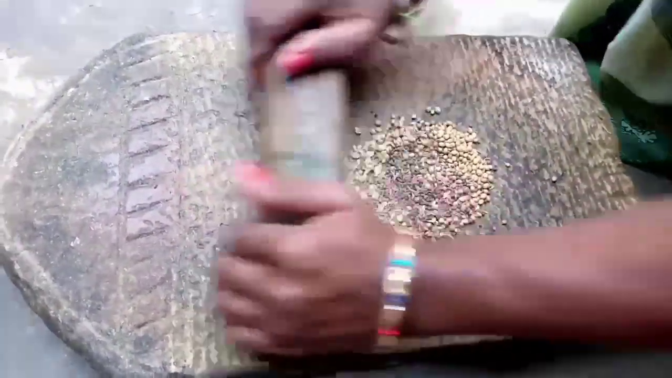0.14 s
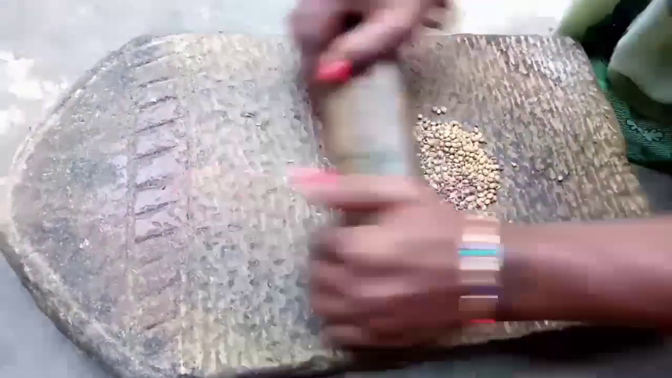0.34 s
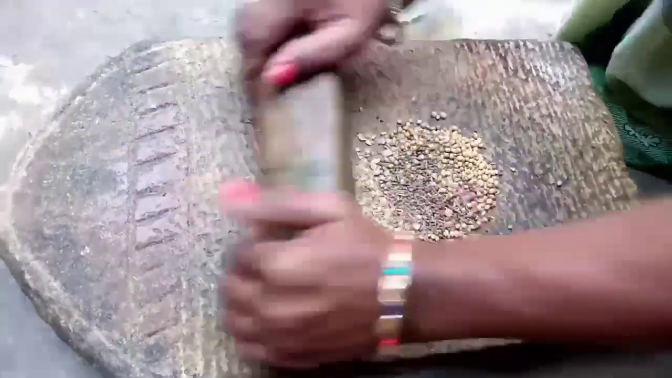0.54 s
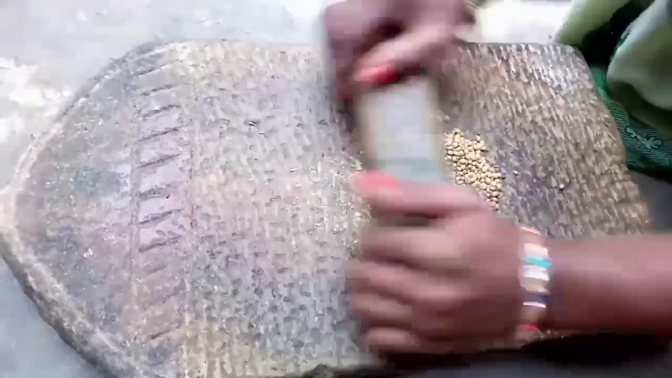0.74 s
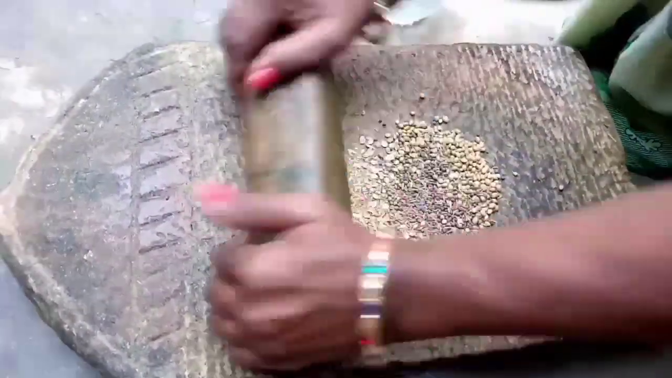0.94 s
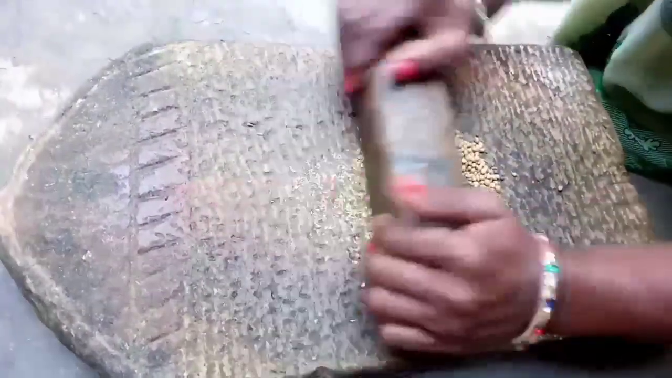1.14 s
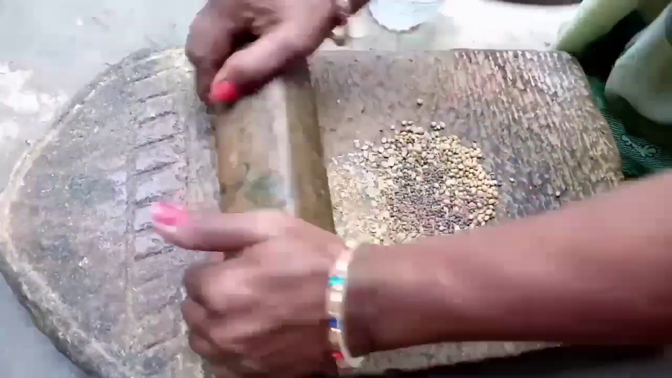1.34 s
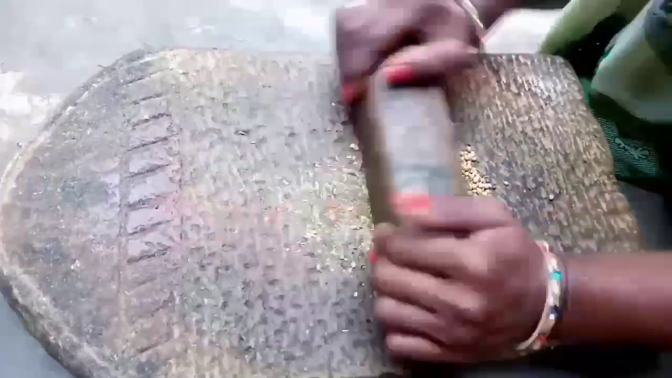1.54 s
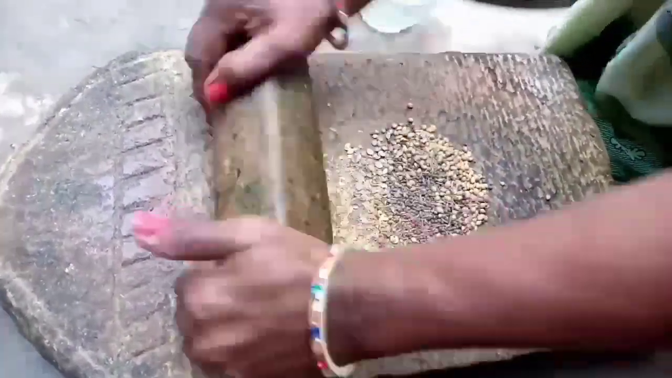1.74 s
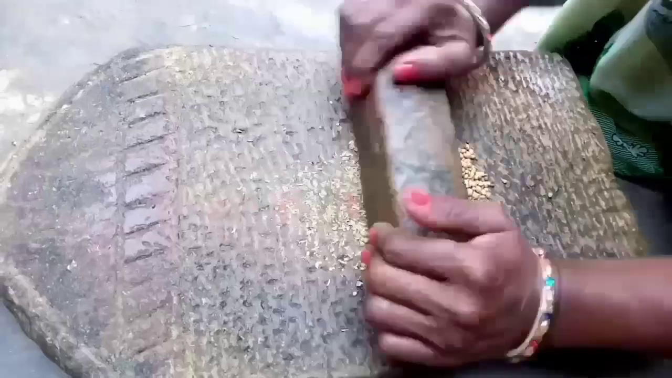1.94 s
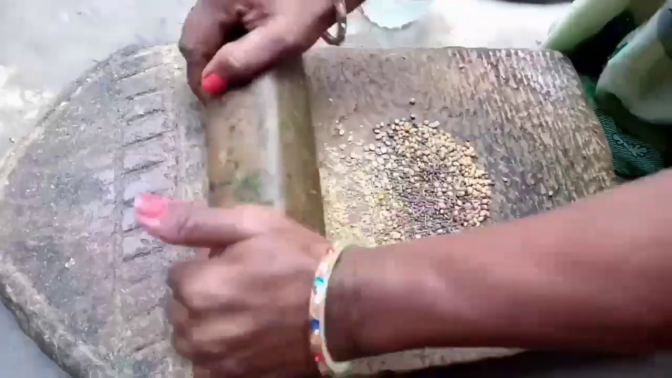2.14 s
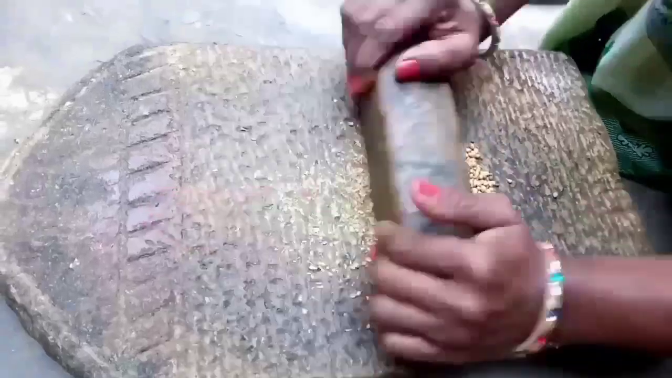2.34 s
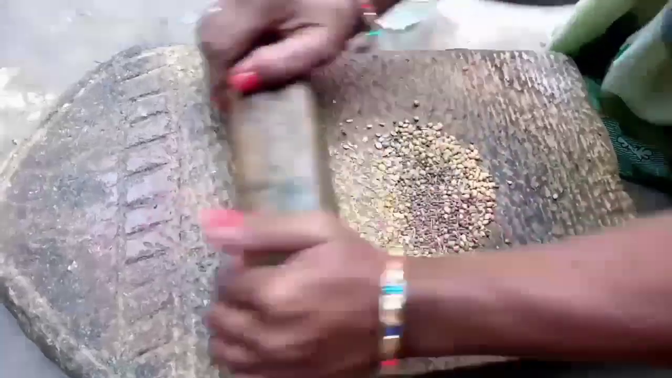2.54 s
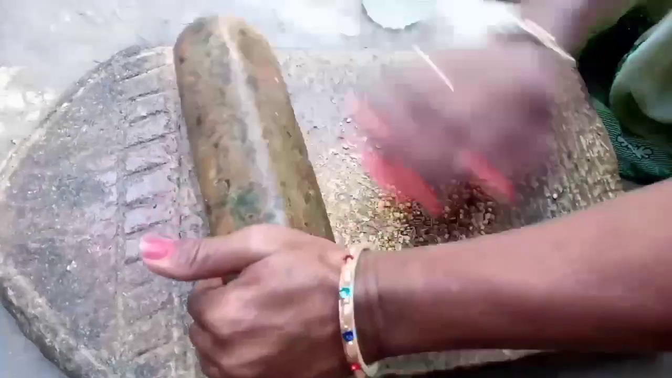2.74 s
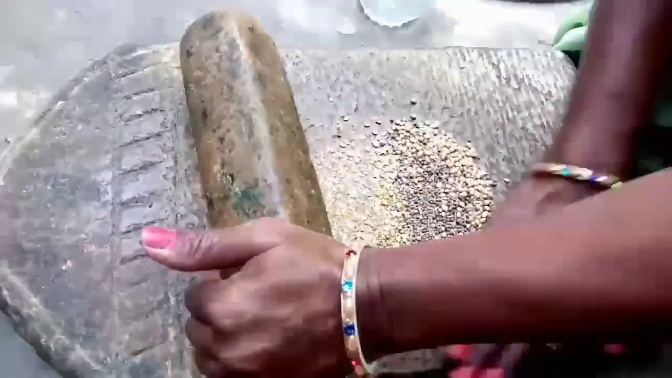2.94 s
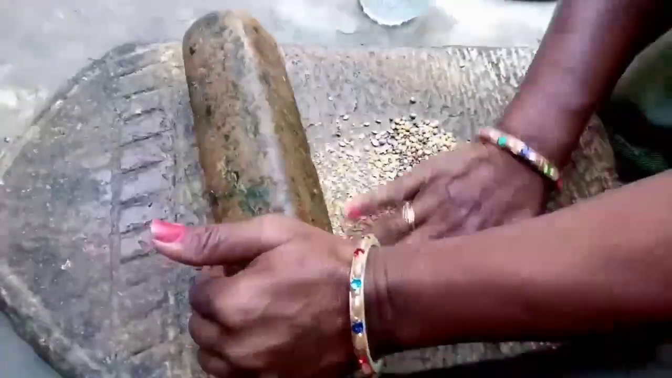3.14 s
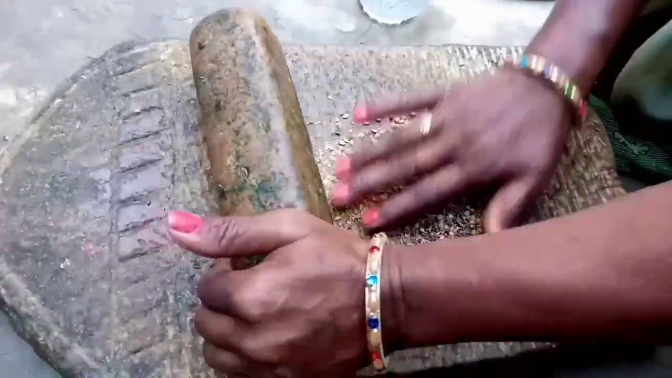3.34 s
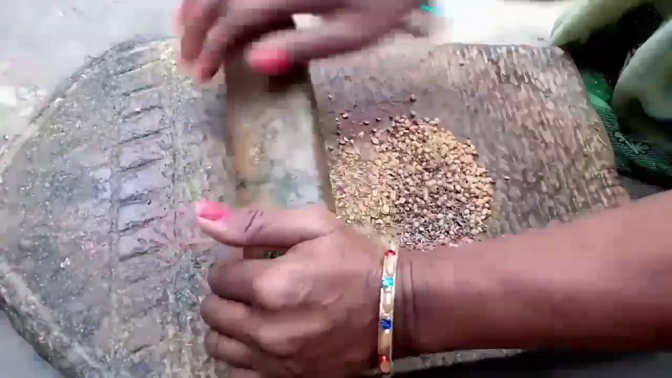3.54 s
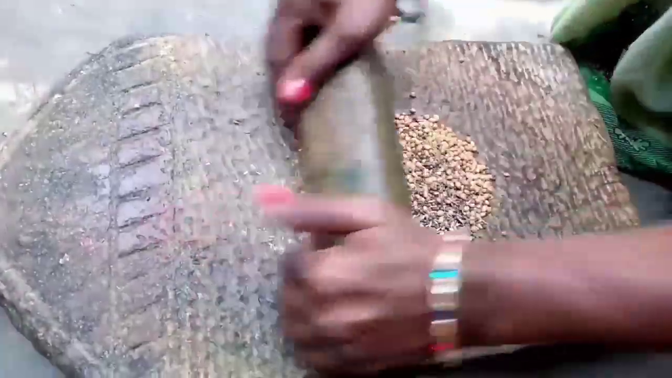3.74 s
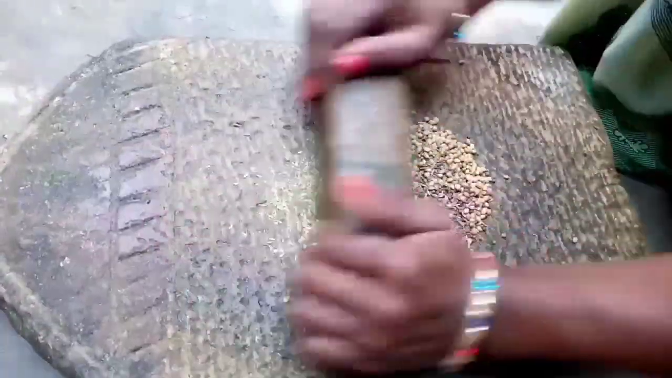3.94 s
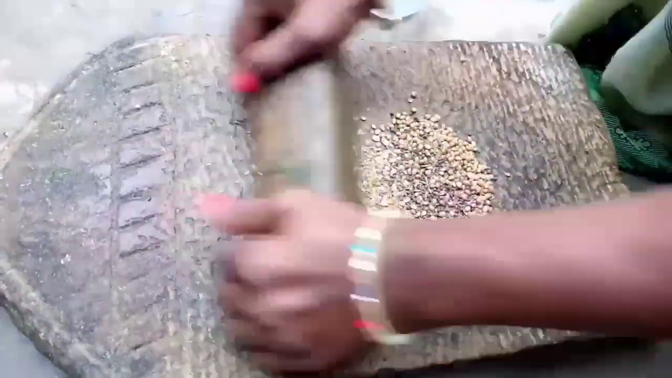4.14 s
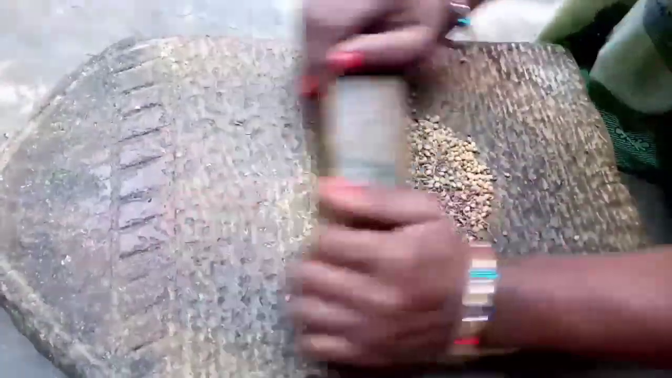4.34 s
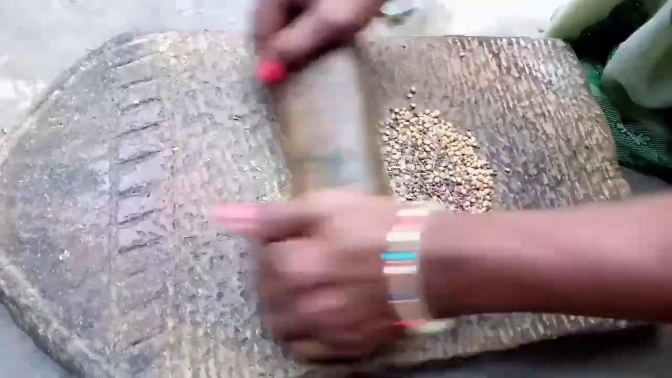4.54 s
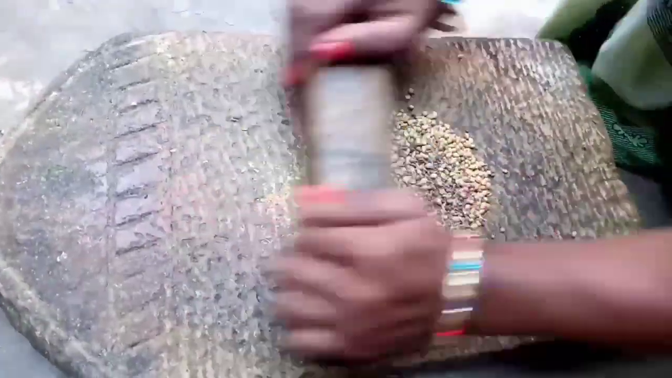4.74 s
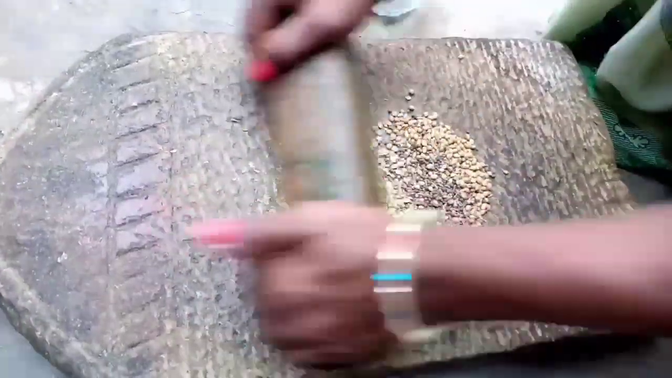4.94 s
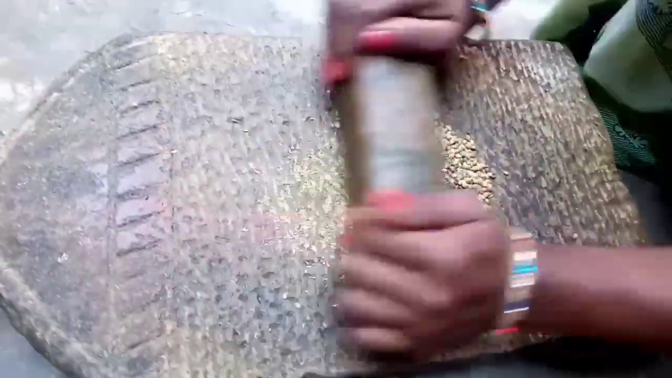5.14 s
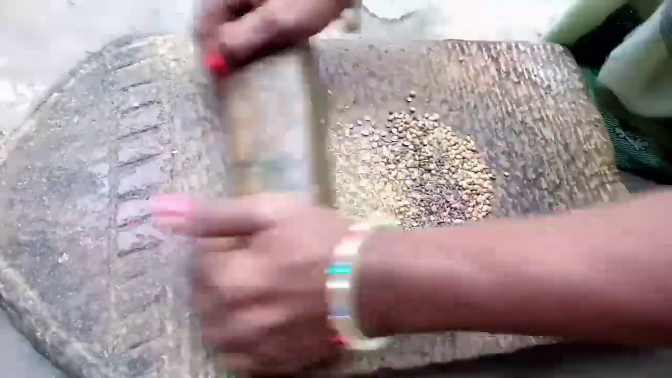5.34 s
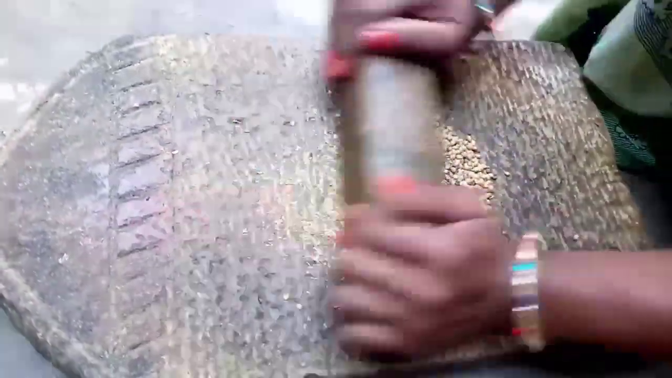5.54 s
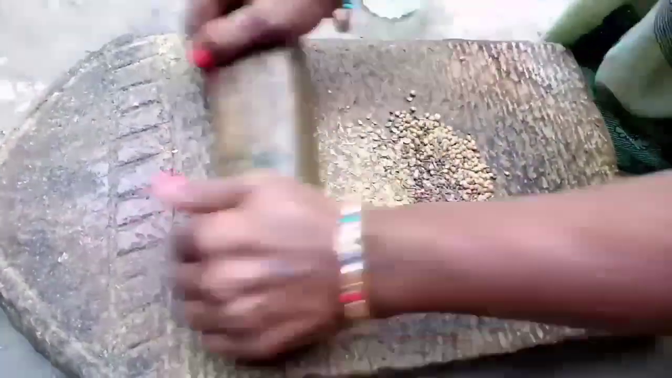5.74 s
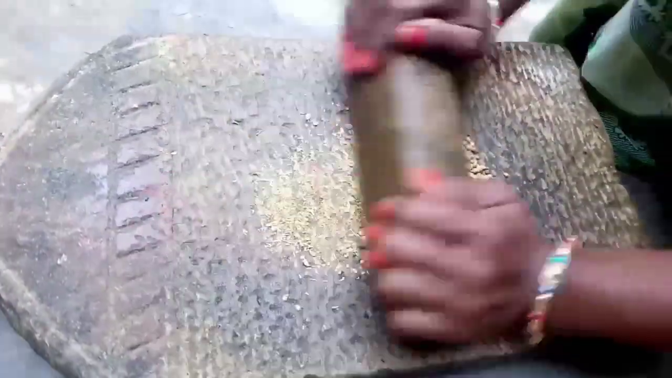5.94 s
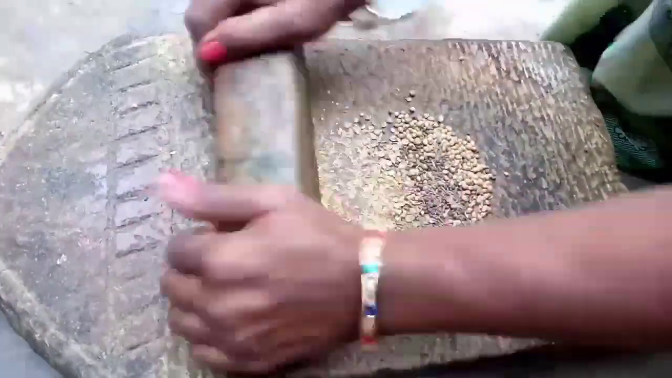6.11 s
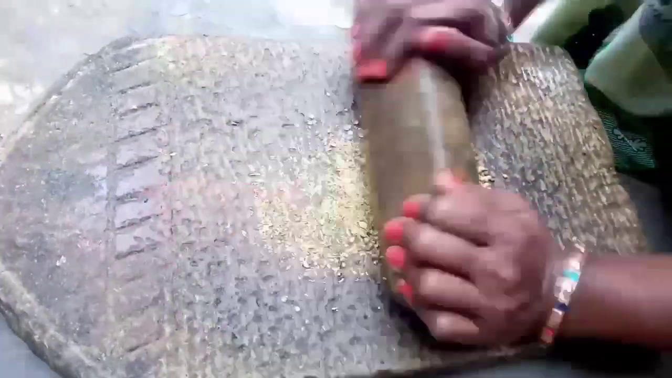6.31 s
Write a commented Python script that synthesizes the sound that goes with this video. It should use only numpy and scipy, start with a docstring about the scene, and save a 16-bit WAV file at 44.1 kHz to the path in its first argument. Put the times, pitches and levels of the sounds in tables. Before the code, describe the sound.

From the first instant, a heavy stone roller grinds dry seeds over a grooved slab, close and dry, in a quiet kitchen with a faint bassy hush. Rounds repeat about every 0.4 seconds until 2.9. Each has hard hollow knocks and a short rasp on bare stone, a ringing slide around 800 hertz that slows onto the heap, a tiny dip at the turn, then a stronger hollow slide back with bright, gritty crunching and occasional sharp seed snaps. Low slab shudders and dull thuds sit underneath. From about 2.9 to 3.9 the grinding stops: low soft shifts of weight, a small palm scuff near 3.3, then a faint patchy rustle of swept seeds until 3.7. Strokes resume around 3.9, the first inward one weak, and continue to the end at about 6.4, slightly softer in crunch, with especially hard knocks near 6.1.

```python
"""A stone roller is pushed back and forth over a grooved slab, close to the microphone in a kitchen.
Most rounds start with knocks and a scrape on bare stone, climb a heap of dry seeds, turn, and crush them
on the way back; halfway through, the roller rests while a hand sweeps the seeds back into a heap.
Random tiny contacts, shaped by each stroke, excite the tones of stone, seeds and slab; knocks, seed bursts
and thuds are single hits, over a hush of filtered noise."""
import sys
import numpy as np
from scipy import signal
from scipy.fft import rfft, irfft, next_fast_len
from scipy.io import wavfile
from scipy.ndimage import map_coordinates

SR = 44100
rng = np.random.default_rng(int(sys.argv[2]) if len(sys.argv) > 2 else 0)


def transcribe(signal):
    """Save signal, clipped to [-1, 1], as a 16-bit WAV file at the path in sys.argv[1]."""
    frames = np.atleast_2d(signal).T
    limited = np.clip(frames, -1, 1)
    pcm = np.round(limited * 32767).astype(np.int16)
    wavfile.write(sys.argv[1], SR, pcm)


N = 280917

# Strokes from bare stone onto the heap. Each row: start in seconds, stop in seconds,
# scrape length in seconds, then relative levels of scrape, ring and crunch in dB.
INWARD_STROKES = [(0.169, .37, 0.097, -48.5, -41, -51.5), (0.561, .745, 0.084, -47.5, -40.5, -54),
                  (0.941, 1.10, .09, -51, -40, -52), (1.334, 1.515, 0.071, -48.5, -41.5, -53),
                  (1.713, 1.872, .10, -49.5, -48, -53), (2.115, 2.30, 0.095, -53.5, -43.5, -54),
                  (2.518, 2.705, 0.07, -49, -37.5, -50.5), (3.93, 4.135, .145, -59.5, -57, -67.5),
                  (4.443, 4.59, .07, -55, -40.5, -53), (4.831, 4.955, .07, -55.5, -40, -48.5),
                  (5.23, 5.371, 0.036, -55, -38, -51), (5.643, 5.788, .055, -55.5, -39.5, -53),
                  (6.055, 6.225, 0.077, -47, -42, -53.5)]
# Strokes off the heap, back to bare stone. Each row: start in seconds, stop in seconds, scrape length
# in seconds, relative levels of scrape, ring and crunch in dB, time of most crunch in seconds.
OUTWARD_STROKES = [(0, .122, .09, -50, -33.5, -39.5, .002), (0.365, 0.515, .065, -54, -30.5, -42.5, .39),
                   (0.737, 0.903, 0.043, -48, -32, -44, .775), (1.095, 1.286, 0.0606, -50, -33, -43, 1.16),
                   (1.509, 1.67, 0.06, -48.5, -30, -44, 1.56), (1.861, 2.076, 0.044, -48, -36, -42.5, 1.95),
                   (2.298, 2.477, 0.061, -51.5, -33, -44, 2.345),
                   (2.703, 2.869, 0.086, -79, -34, -42.5, 2.735),
                   (4.124, 4.398, 0.063, -54, -40.5, -45.5, 4.29),
                   (4.573, 4.791, 0.046, -47.5, -37, -47, 4.69),
                   (4.962, 5.183, 0.068, -62.5, -38, -46.5, 5.08),
                   (5.372, 5.606, 0.02, -52, -35.5, -44.5, 5.47),
                   (5.785, 6.023, .055, -50, -36.5, -48, 5.90), (6.214, 6.47, .06, -58, -37.5, -47, 6.33)]
# The stone's low note under a sliding roller. Each row: frequency in Hz, relative level in dB per Hz.
HOLLOW_NOTE = [(200, -46), (600, -44), (720, -29), (770, -11), (802, -3), (850, 2.5), (915, -7.5),
               (1100, -20), (1350, -30.5), (1700, -43), (3000, -65.5), (6000, -96)]
# The tone of breaking seeds. Each row: frequency in Hz, relative level in dB per Hz.
CRUNCH_TONE = [(600, -37), (1300, -16.5), (1800, -11.5), (2130, -10.5), (2300, -11.5), (3300, -25.5),
               (4150, -7.5), (4700, 2.5), (5500, -6), (7700, -14.5), (10300, -5.5), (13700, -10.5),
               (14700, 6.5), (15500, 0.5)]
BITE_S, LIFT_S = 0.024, 0.042  # the roller takes hold, and lets go
TURN_S, COAST_S = 0.021, 0.03  # stopping or starting on the heap; sliding on after the last scrape


def amp(db):
    """Decibels to gain."""
    return 10 ** (np.asarray(db) / 20)


def unit(x):
    """Scale to rms 1."""
    return x / np.sqrt(np.mean(x ** 2) + 1e-20)


def gains(table):
    """One gain per sample for each dB column; -120 dB outside the table's times."""
    s, *columns = np.transpose(table)
    t = np.arange(N) / SR
    return [amp(np.interp(t, s, column, left=-120, right=-120)) for column in columns]


def response(points):
    """The causal, minimum-phase impulse response that has a given (Hz, dB) spectrum."""
    size = 4096
    hz, db = np.transpose(points)
    level_db = np.interp(np.log(np.fft.rfftfreq(size, 1 / SR) + 1), np.log(hz), db)
    cepstrum = irfft(np.log(amp(level_db) + 1e-6))
    # fold the second half onto the first, so that nothing sounds before the blow
    cepstrum[1:size // 2] *= 2
    cepstrum[size // 2 + 1:] = 0
    return irfft(np.exp(rfft(cepstrum)))


def coloured(x, points):
    """x through a body with this spectrum, about keeping its power if x is noise-like."""
    ring = response(points)
    return signal.fftconvolve(x, ring / np.linalg.norm(ring))[:N]


def resonate(x, modes):
    """Noise-like x through damped modes twice, for deep valleys between them; about keeps its power."""
    t = np.arange(SR // 40) / SR
    once = np.zeros(len(t))
    for hz, width_hz, db in modes:
        decay = np.exp(-np.pi * width_hz * t)
        once += amp(db) * width_hz * decay * np.cos(2 * np.pi * hz * t)
    once[0] /= 2
    twice = signal.fftconvolve(once, once)
    return signal.fftconvolve(x, twice / np.linalg.norm(twice))[:N]


def wobble(rate):
    """A smooth random curve, rate knots a second."""
    return map_coordinates(rng.standard_normal(N // 8), [np.arange(N) * rate / SR], mode="mirror")


def grit(rate, spread_db):
    """Tiny contacts at random moments, about rate a second, with scattered sizes, at rms 1."""
    touches = rng.random(N) < rate / SR
    signs = rng.choice([-1, 1], N)
    sizes = amp(spread_db * rng.standard_normal(N))
    return unit(touches * signs * sizes)


def add(out, s, db, sound):
    """Mix in a sound at time s with this peak level."""
    part = out[round(s * SR):][:len(sound)]
    part += amp(db) * sound[:len(part)] / np.abs(sound).max()


def swell(start, stop, rise_s, fall_s):
    """A gain that rises smoothly from start, holds, and has fallen by stop."""
    gain = np.zeros(N)
    during = np.arange(max(0, int(start * SR)), min(N, int(stop * SR)))
    up = np.clip((during / SR - start) / rise_s, 0, 1)
    down = np.clip((stop - during / SR) / fall_s, 0, 1)
    gain[during] = (up * (2 - up) * down * (2 - down)) ** 2
    return gain


def contact():
    """Gains of ring and rasp: the roller scrapes bare stone, slows onto the seeds, gathers speed again."""
    slowing_db = 9  # ring lost as the roller slows on the way in
    gather_db, gather_s = 10.5, 0.17  # ring regained on the way out, and in what time
    brake_s = 0.13  # braking on the way out
    scrape_ring_db = 17.5  # the low note over the rasp on bare stone
    slide_rasp_db = -22  # the rasp under the low note while seeds cushion the roller
    t = np.arange(N) / SR
    scrape, slide = np.zeros((2, N))
    for start, stop, scrape_s, scrape_db, ring_db, _ in INWARD_STROKES:
        scrape += amp(scrape_db) * swell(start, start + scrape_s + LIFT_S / 2, BITE_S, LIFT_S)
        speed_db = np.interp(t, [start + scrape_s, stop], [0, -slowing_db])
        slide += amp(ring_db + speed_db) * swell(start - TURN_S / 2, stop + TURN_S / 2, BITE_S, TURN_S)
    for start, stop, scrape_s, scrape_db, ring_db, *_ in OUTWARD_STROKES:
        scrape += amp(scrape_db) * swell(stop - scrape_s, stop, BITE_S, LIFT_S)
        speed_db = np.interp(t, [start, start + gather_s], [-gather_db, 0])
        slide += amp(ring_db + speed_db) * swell(start, stop + COAST_S, TURN_S, brake_s)
    ring = np.hypot(slide, amp(scrape_ring_db) * scrape)
    rasp = np.hypot(scrape, amp(slide_rasp_db) * slide)
    return ring, rasp


def roller():
    """Bumps over the grooves ring the stone's low note; finer grit rasps in its higher modes."""
    # The stone's higher modes. Each row: frequency in Hz, width in Hz, relative level in dB.
    rasp_modes = [(2157, 86, 5.5), (2396, 230, 3), (2675, 200, -2.5), (3136, 190, 0), (4106, 180, 0.5),
                  (4610, 250, 0), (4648, 120, -6.5), (6120, 260, -18.5), (9800, 1800, -11.5),
                  (15100, 1100, -9.5)]
    # The dull rub of bare stone. Each row: frequency in Hz, relative level in dB per Hz.
    rub_tone = [(120, -28), (240, 4), (310, -4), (420, 1), (700, 1), (1250, -9), (1700, -11.5),
                (2800, -13.5), (5000, -44)]
    ring, rasp = contact()
    bumps = grit(rate=840, spread_db=4.5) * unit(amp(2.2 * wobble(rate=35)))
    hollow = coloured(ring * bumps, HOLLOW_NOTE)
    fine_grit = grit(rate=4300, spread_db=8.5) * unit(amp(3.1 * wobble(rate=100)))
    rasping = resonate(rasp * fine_grit, rasp_modes)
    # the dull rub needs firm contact of bare stone
    firm = rasp / np.hypot(rasp, amp(-48.0))
    rub = coloured(firm * rasp * grit(rate=4700, spread_db=9.5), rub_tone)
    return amp(0.5) * hollow + amp(-0.5) * rasping + amp(4.5) * rub


def heap():
    """Gain of the crunch: it grows up the heap, dips at the turn, peaks on the way back and fades."""
    climb_s, climb_db = 0.12, 36.5  # onto the heap: time, and growth of the crunch
    build_db_per_s, leave_db = 70, 45  # build-up after the turn, then the fall by the stop
    dust = amp(-77.5)  # crunch of the powder left on bare stone
    t, crunch = np.arange(N) / SR, np.zeros(N)
    for start, stop, *_, db in INWARD_STROKES:
        growth_db = np.interp(t, [start, start + climb_s], [-climb_db, 0])
        crushed = amp(db + growth_db) + dust
        crunch += crushed * swell(start - COAST_S, stop + TURN_S / 2, BITE_S, LIFT_S)
    for start, stop, *_, db, peak in OUTWARD_STROKES:
        build_db = -build_db_per_s * np.maximum(peak - t, 0)
        fade_db = -leave_db * np.clip((t - peak) / (stop - peak), 0, 1) ** 1.47
        crushed = amp(db + build_db + fade_db) + dust
        crunch += crushed * swell(start, stop + COAST_S, TURN_S, LIFT_S)
    return crunch


def crushing():
    """Seeds crumble in clumps of tiny fractures, with coarser husk crackle; light pressure breaks few."""
    crunch = heap() * amp(1.8 * wobble(rate=22))
    breaking = crunch / np.hypot(crunch, amp(-76))
    fractures = grit(rate=12000, spread_db=6.5) * unit(amp(2.6 * wobble(rate=270)))
    splits = grit(rate=3000, spread_db=2.5)
    husks = splits * unit(amp(5.4 * np.minimum(wobble(rate=160), 2)))
    powder = coloured(breaking * crunch * fractures, CRUNCH_TONE)
    husk_tone = [(1000, -31.0), (2500, -5), (4700, 1.5), (7000, -4.5), (12000, -14.0)]  # Hz, dB per Hz
    crackle = coloured(breaking * crunch * husks, husk_tone)
    return amp(3.0) * powder + amp(-11.5) * crackle


def load():
    """Gain and middle pitch of the shudder: the weight on the slab eases over the heap near each turn."""
    weight_db, eased_most_db = -49.5, -6.5  # relative level while leaning, and its change in mid-stroke
    lean_s, overhang_s = 0.17, 0.025  # leaning begins before the turn, and lasts past the stop
    ease_lag_s, ease_s = 0.04, 0.11  # lightest just after the turn: delay, half-width
    lighten_db_per_s = 0.62  # the leaning slowly lightens
    slab_hz, slab_hz_per_db = 130.2, 0.46  # the slab shudders higher under more weight
    t, weight, pitch = np.arange(N) / SR, np.zeros(N), np.full(N, slab_hz)
    for turn, stop, *_ in OUTWARD_STROKES:
        eased_db = eased_most_db * np.exp(-((t - turn - ease_lag_s) / ease_s) ** 2)
        held = amp(weight_db + eased_db) * swell(turn - lean_s, stop + overhang_s, BITE_S, LIFT_S)
        pitch = np.where(held > weight, slab_hz + slab_hz_per_db * eased_db, pitch)
        weight = np.maximum(weight, held)
    return weight * amp(-lighten_db_per_s * t), pitch


def shudder(hz):
    """The slab's low vibration, unsteady in pitch and strength, at rms 1."""
    pitch = hz * (1 + 0.11 * wobble(rate=26))
    flutter = amp(4.5 * wobble(rate=60))
    return unit(np.sin(2 * np.pi * np.cumsum(pitch) / SR) * flutter)


def slab():
    """Shifting weight makes the heavy slab shudder at a wandering pitch and thud dully on the ground."""
    # Weight shifts around the rest. Each row: start in seconds, stop in seconds,
    # relative shudder level in dB, middle pitch in Hz.
    shifts = [(2.92, 3.25, -56.5, 104), (3.448, 3.78, -64, 88.05), (3.872, 4.21, -57.5, 99.6)]
    # The roller tips onto another face and jolts the slab. Each row: time in seconds, relative peak in dB.
    tips = [(.138, -41.5), (.183, -40), (0.254, -37), (.564, -39.5), (.575, -38.5), (.630, -37.5),
            (0.941, -39), (1.001, -35), (1.325, -42.5), (1.387, -43), (1.718, -39.5), (1.790, -40.5),
            (2.034, -42), (2.118, -37), (2.203, -41), (2.522, -36.5), (2.599, -43.5), (4.443, -41),
            (4.516, -38), (4.820, -46), (4.896, -45.5), (5.237, -45), (5.312, -41), (5.657, -42.5),
            (5.73, -40), (6.056, -38.5), (6.136, -39)]
    # The slab's rumble. Each row: frequency in Hz, relative level in dB per Hz.
    rumble_tone = [(20, -36.5), (45, -17), (75, -1), (110, -4), (140, -6.5), (175, -5.5), (220, -17.5),
                   (300, -36), (600, -71)]
    # A jolt of the slab. Each row: frequency in Hz, relative level in dB per Hz.
    jolt_tone = [(25, -34.5), (70, -20.5), (115, 2), (145, 9), (175, -0.5), (215, -14.5), (330, -16.5),
                 (600, -38), (1500, -88)]
    weight, hz = load()
    for start, stop, db, low_hz in shifts:
        held = amp(db) * swell(start, stop, rise_s=0.04, fall_s=0.31)
        hz = np.where(held > weight, low_hz, hz)
        weight = np.maximum(weight, held)
    # under little weight the slab mostly shudders; the broad rumble needs pressure
    pressed = weight / np.hypot(weight, amp(-60))
    rumble = coloured(pressed * weight * grit(rate=700, spread_db=0.5), rumble_tone)
    thuds = np.zeros(N)
    for s, db in tips:
        add(thuds, s, db, response(jolt_tone))
    return amp(-2.0) * weight * shudder(hz) + amp(-2.5) * rumble + amp(1.0) * thuds


def room():
    """The faint hush of the kitchen: steady noise, strongest in the bass."""
    # The hush. Each row: frequency in Hz, relative level in dB per Hz.
    hush_tone = [(15, -39.5), (25, -24), (87, -3.5), (344, -15.5), (405, -19), (503, -13), (545, -14.5),
                 (754, -18), (7920, -25), (16000, -30.5)]
    return amp(-79.5) * coloured(rng.standard_normal(N), hush_tone)


def knocks():
    """Each drop of the roller chatters briefly and rings the stone, a little higher or lower by contact."""
    # The roller drops onto the slab. Each row: time in seconds, relative peak in dB.
    drops = [(.038, -10), (.056, -28), (.072, -22.5), (.099, -20), (.186, -43), (.195, -32), (.213, -25),
             (.220, -25.5), (.229, -16), (.239, -14), (.480, -22), (.604, -19.5), (.622, -10), (.633, -24),
             (.963, -17), (.974, -16.5), (1.004, -16.5), (1.257, -22), (1.358, -28.5), (1.381, -14.5),
             (1.393, -16), (1.644, -26.5), (1.756, -12), (1.766, -16.5), (1.792, -27), (1.800, -20),
             (2.044, -26.5), (2.121, -19.5), (2.156, -24), (2.195, -23), (2.559, -23.5), (4.012, -16),
             (4.047, -28), (4.285, -29.5), (4.363, -27.5), (4.487, -17.5), (4.754, -15), (4.860, -22.5),
             (5.310, -27), (5.673, -21), (6.077, -16.5), (6.086, -24.5), (6.093, -15.5), (6.112, -8.5),
             (6.116, -11)]
    # The stone's low note under a knock. Each row: frequency in Hz, relative level in dB per Hz.
    stone_note = [(150, -52.5), (300, -50.5), (480, -33.5), (660, -39), (735, -26.5), (775, -8.5), (805, 2),
                  (855, 0.5), (920, -6), (1100, -23.5), (1500, -43), (2200, -51), (3500, -71.5),
                  (8000, -93)]
    out, t = np.zeros(N), np.arange(SR // 60) / SR
    for (s, db), shift in zip(drops, rng.standard_normal(len(drops))):
        # one sharp blow, then chatter that falls 60 dB in 52 ms and is cut off sooner
        blow = 0.022 * rng.standard_normal(len(t)) * amp(-60 * t / 0.052)
        blow[0] = 1
        ring = response([(hz * (1 + 0.0074 * shift), level) for hz, level in stone_note])
        add(out, s, db, signal.fftconvolve(blow, ring))
    return amp(1.0) * out


def bursts():
    """A whole seed snaps and its pieces crumble right after: noise with a fast and a slower decay."""
    # Single seeds burst. Each row: time in seconds, relative peak in dB.
    snaps = [(0.3702, -23.5), (0.7534, -20), (1.0949, -23), (1.1568, -18), (1.8766, -21.5), (1.945, -17),
             (2.6783, -24.5), (3.927, -33.5), (4.6023, -24), (5.4081, -22), (5.8048, -34), (5.8408, -36.5),
             (6.2342, -20.5)]
    out, t = np.zeros(N), np.arange(SR // 20) / SR
    snap, crumble = amp(-60 * t / 0.012), amp(-21) * amp(-60 * t / 0.05)
    for s, db in snaps:
        noise = (snap + crumble) * rng.standard_normal(len(t))
        add(out, s, db, signal.fftconvolve(noise, response(CRUNCH_TONE)))
    return amp(-1.0) * out


def hand():
    """The palm lands with a small scuff, and loose seeds drag over the grooves in uneven patches."""
    # The hand gathers seeds. Each row: time in seconds, relative levels of rustle and of slab ring in dB.
    sweep = [(3.2, -98, -100), (3.258, -86.5, -102), (3.294, -62.5, -81), (3.326, -65, -99),
             (3.46, -64, -74), (3.604, -65.5, -63.5), (3.648, -100.5, -102), (3.72, -98.5, -102)]
    # Swept seeds. Each row: frequency in Hz, relative level in dB per Hz.
    rustle_tone = [(700, -33.5), (1400, -11.5), (2100, -13), (2800, -15.5), (3500, -11.5), (5200, -4.5),
                   (7900, -23), (10500, -9), (13000, -14), (14800, 2), (15500, -5.5)]
    rustle, ring = gains(sweep)
    tumbling = grit(rate=2600, spread_db=4)
    seeds = coloured(rustle * tumbling * unit(amp(1.7 * wobble(rate=57))), rustle_tone)
    scuff, t = np.zeros(N), np.arange(SR // 10) / SR
    # noise that falls 60 dB in 0.18 s, cut off at 0.1 s
    add(scuff, 3.285, -50, rng.standard_normal(len(t)) * amp(-60 * t / 0.18))
    scuff_tone = [(1200, -29), (2900, -3.5), (4500, 6), (7000, -19), (15000, -24)]  # Hz, dB per Hz
    scuff = coloured(scuff, scuff_tone)
    hollow = coloured(ring * grit(rate=820, spread_db=1.5), HOLLOW_NOTE)
    return amp(-0.5) * seeds + scuff + amp(-4.5) * hollow


def surroundings(x):
    """The floor and nearby things send back twelve weak echoes within 2 to 16 ms."""
    delay, size = rng.random((2, 12))
    echoes = np.zeros(SR // 10)
    for s, db in zip(0.002 + 0.014 * delay, -6 * size):
        echoes[round(s * SR)] += amp(db - 60 * s / 0.061) * rng.choice([-1, 1])
    return x + amp(-12) * signal.fftconvolve(x, echoes / np.linalg.norm(echoes))[:N]


def scene():
    """The grinding stone over the hush of the kitchen; knocks and slab come without the echoes."""
    hush = room()
    echoed = surroundings(roller() + crushing() + bursts() + hand())
    return (echoed + knocks() + slab() + hush)[None]


def record(dry):
    """The sound is limited to below 15.6 kHz."""
    top_hz = 15600
    size = next_fast_len(N + SR // 2)
    kept = np.fft.rfftfreq(size, 1 / SR) < top_hz
    return irfft(rfft(dry, size) * kept, size)[..., :N]


dry = scene()
out = record(dry)
transcribe(out)
```